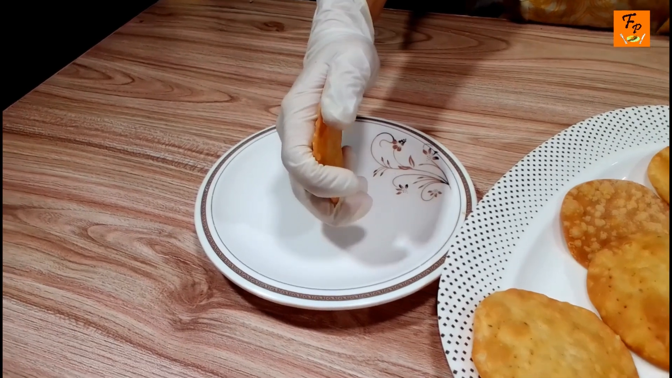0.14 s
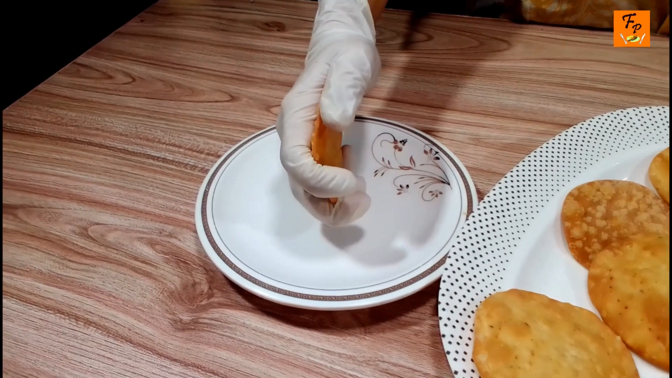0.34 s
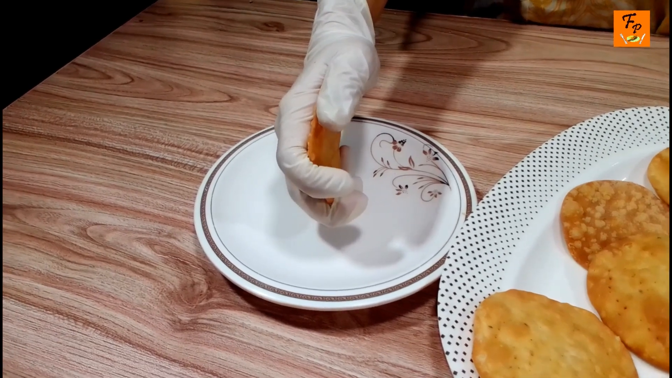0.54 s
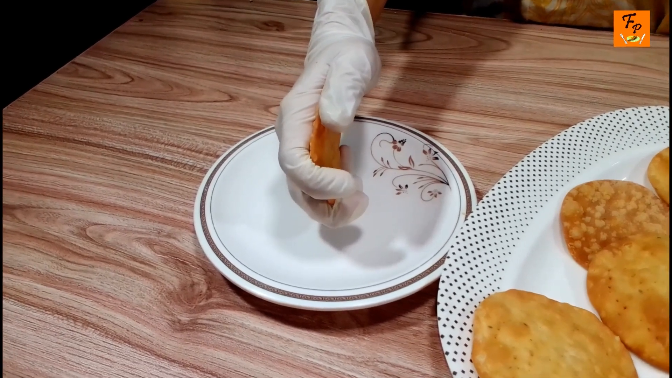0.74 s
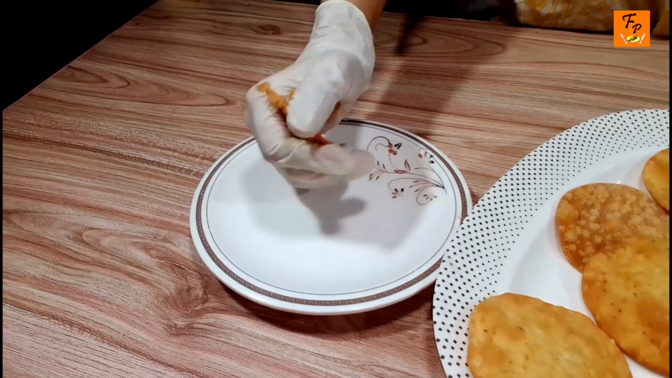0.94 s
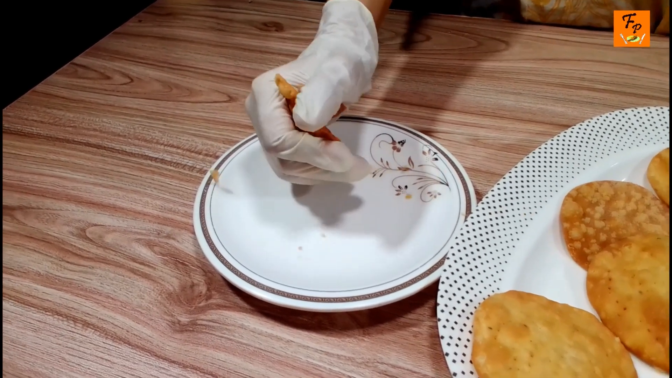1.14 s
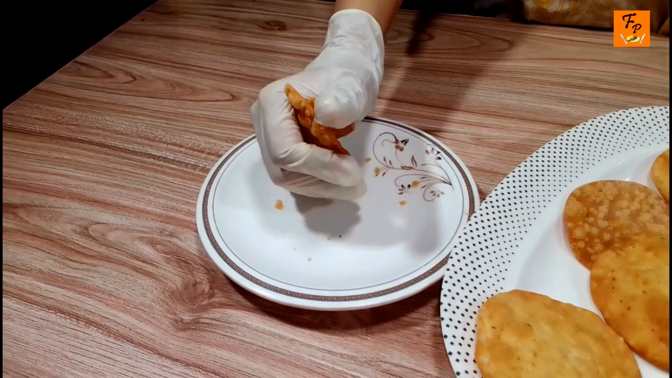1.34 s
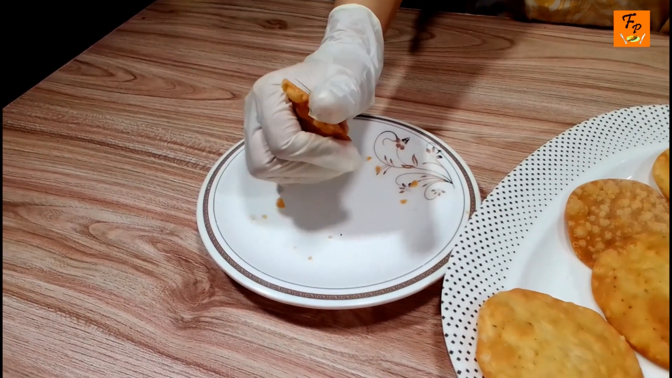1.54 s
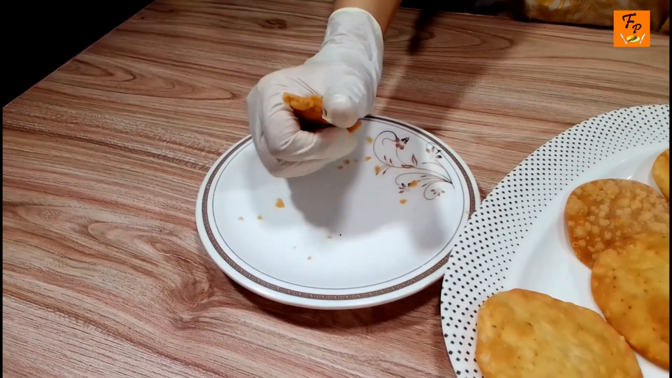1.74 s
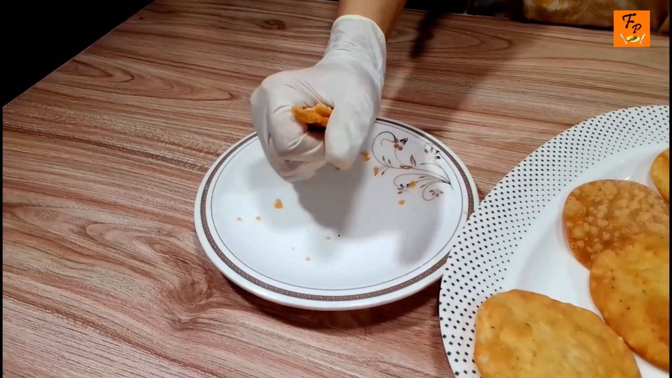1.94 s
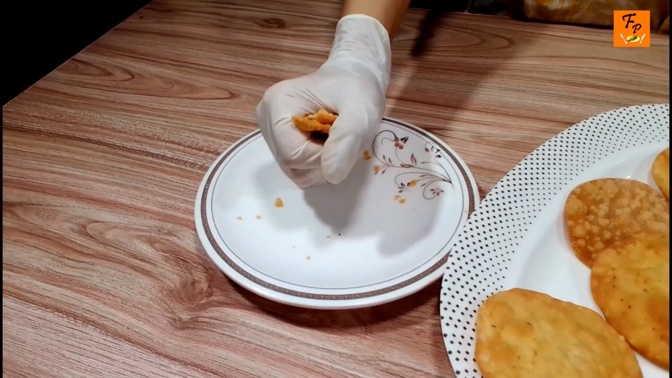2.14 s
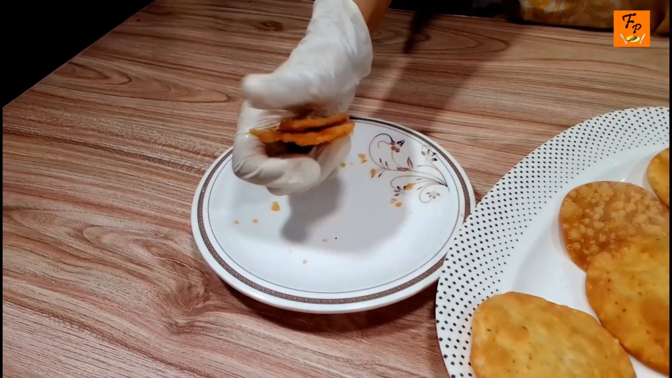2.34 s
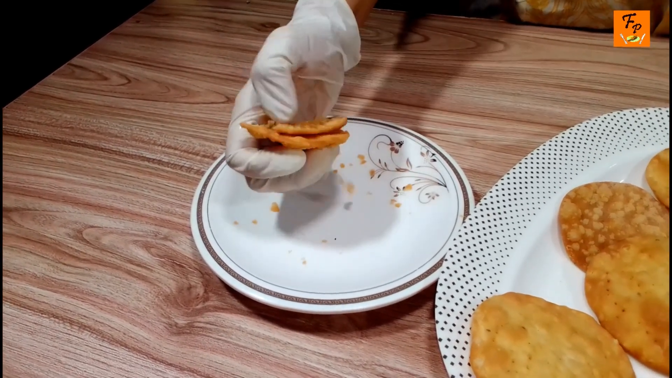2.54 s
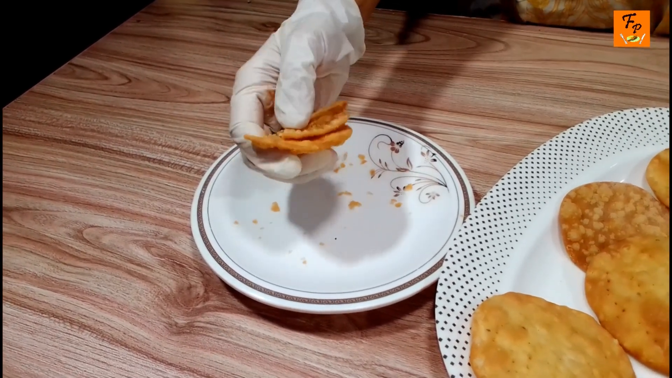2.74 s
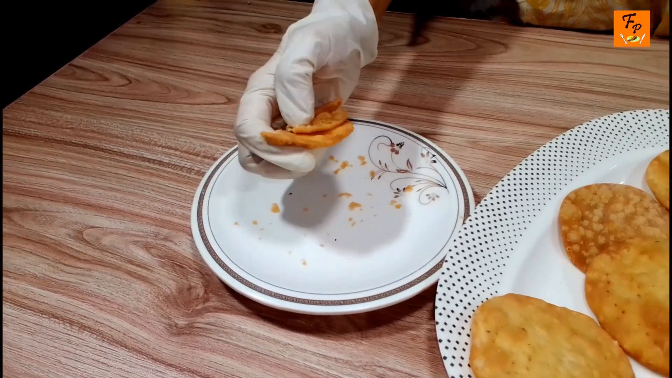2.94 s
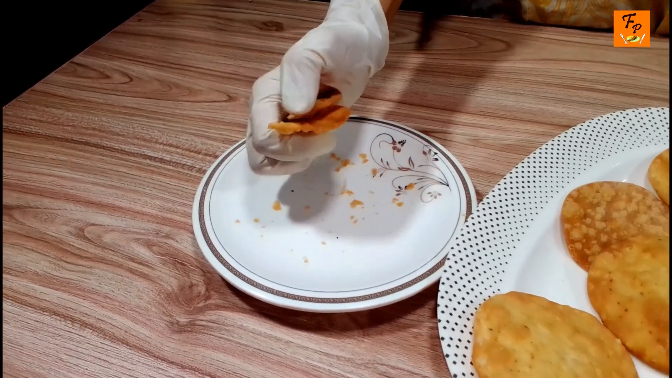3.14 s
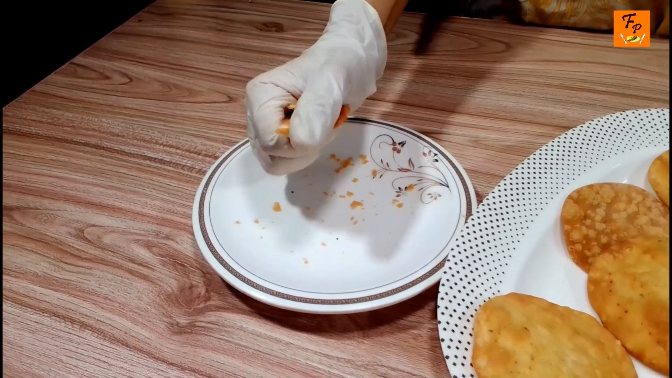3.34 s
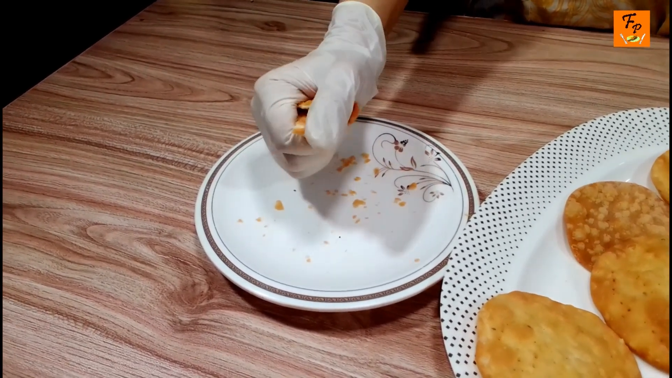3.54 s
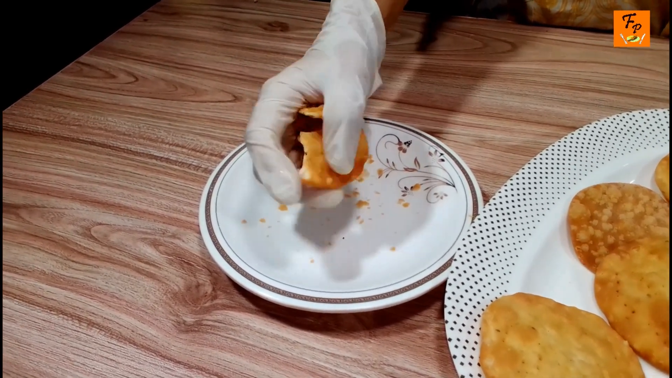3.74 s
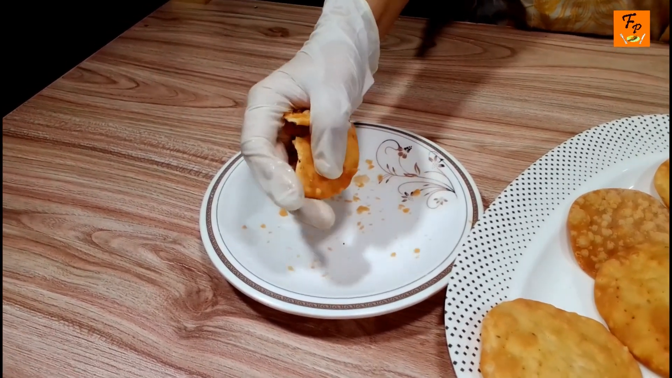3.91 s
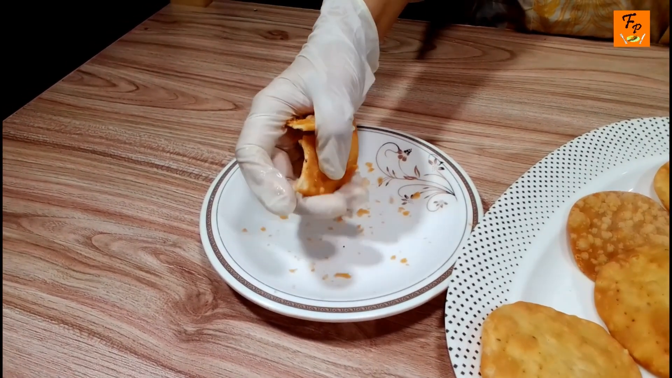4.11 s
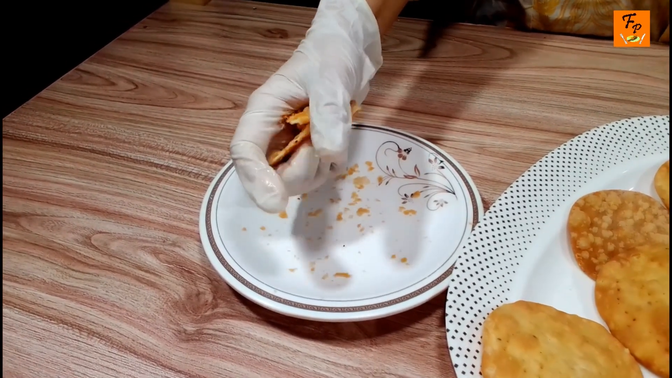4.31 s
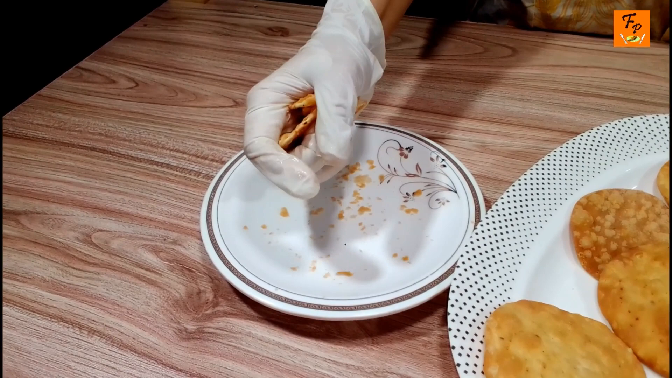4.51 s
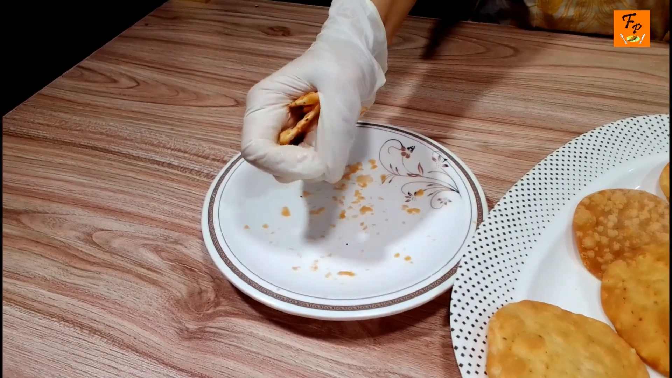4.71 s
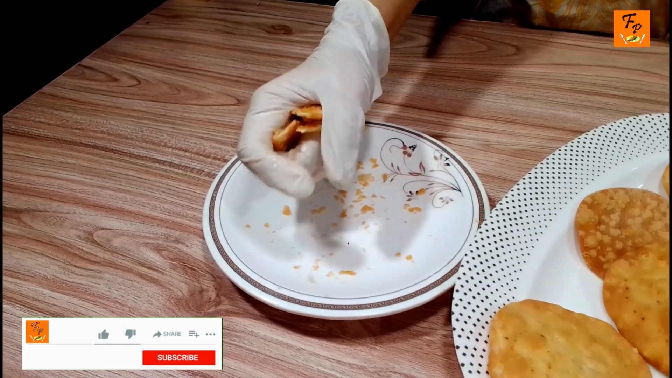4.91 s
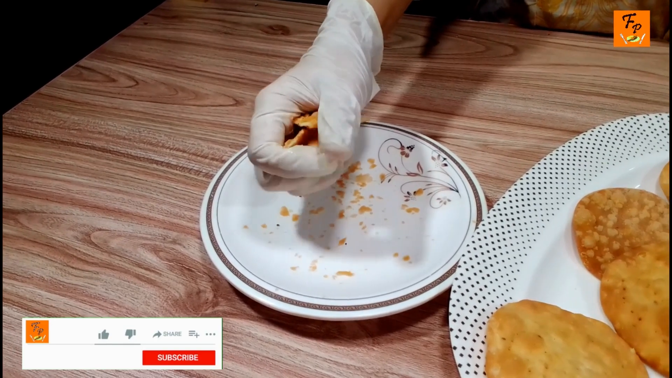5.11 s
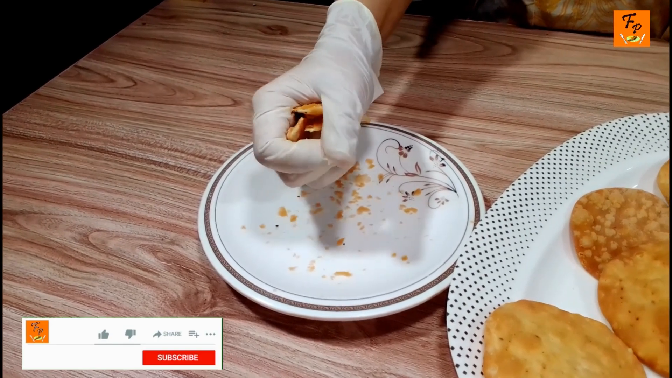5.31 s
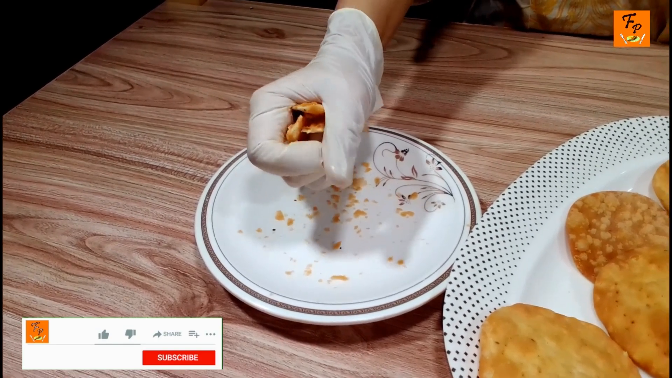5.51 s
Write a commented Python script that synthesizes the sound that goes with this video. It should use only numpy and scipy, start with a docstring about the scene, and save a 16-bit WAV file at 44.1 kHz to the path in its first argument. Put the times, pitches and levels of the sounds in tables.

```python
"""Crisp fried wafers crushed in a gloved hand over a plate, in four squeezes, heard close up in a quiet, live kitchen.
Each fracture is a burst of tiny breaks that rings the broken piece; flakes tick and crumble in between.
The glove hisses, pieces squeak in the grip and the plate rings faintly, over a steady room noise.
The close microphone has a strong peak near 4 kHz and its input clips on the biggest snaps."""
import sys
import numpy as np
from scipy import signal
from scipy.fft import rfft, irfft, next_fast_len
from scipy.io import wavfile

SR = 44100
rng = np.random.default_rng(int(sys.argv[2]) if len(sys.argv) > 2 else 0)


def digitize_waveform(pressure):
    """Quantize a signal to 16-bit integers and store it at the path in sys.argv[1].

    Rows of a 2-D input are taken as channels; values are limited to [-1, 1].
    """
    field = np.atleast_2d(pressure).T
    bounded = np.clip(field, -1, 1)
    quanta = np.round(bounded * 32767).astype(np.int16)
    wavfile.write(sys.argv[1], SR, quanta)


N = 245322   # samples in the scene
CRACK_SIZE = 2048   # samples in one fracture
LEVEL_WINDOW_S = .003   # the level of a snap or flake is its rms as if spread over this time


def from_db(db):
    """Decibels to gain."""
    return 10 ** (np.asarray(db) / 20)


def unit_energy(x):
    """Scale to a sum of squares of one."""
    return x / np.sqrt(np.sum(x ** 2) + 1e-20)


def at_hz(points, hz):
    """Read a two-column table on a log-frequency axis."""
    knots, values = np.transpose(points)
    return np.interp(np.log(np.maximum(hz, 1)), np.log(knots), values)


def bands_of(rows, hz):
    """Read every column of a table at one frequency."""
    table = np.array(rows)
    return [np.interp(np.log(hz), np.log(table[:, 0]), column) for column in table[:, 1:].T]


def at_time(rows, s):
    """Read every column of a curve at one moment."""
    times, *columns = np.transpose(rows)
    return [np.interp(s, times, column) for column in columns]


def bins(size):
    """Frequencies of a real transform, in Hz."""
    return np.arange(size // 2 + 1) * SR / size


def resonance(ratio, q):
    """Gain of one mode, 1 on top, against frequency over its own."""
    return ratio / q / np.hypot(1 - ratio ** 2, ratio / q)


def above(ratio, order):
    """A smooth step from 0 to 1 as the ratio passes one."""
    return 1 - 1 / (1 + ratio ** order)


def causal(gain):
    """Minimum-phase response with these gains: it rings only after the blow."""
    cepstrum = irfft(np.log(gain + 1e-9))
    half = len(cepstrum) // 2
    cepstrum[1:half] *= 2
    cepstrum[half + 1:] = 0
    return np.exp(rfft(cepstrum))


def noise(spectrum):
    """Steady coloured noise, rms 1."""
    size = 2 * next_fast_len(N // 2 + 1)
    white = rfft(rng.standard_normal(size))
    coloured = irfft(white * from_db(at_hz(spectrum, bins(size))))
    return unit_energy(coloured[:N]) * np.sqrt(N)


def add(track, s, sound):
    """Mix a sound in at a time in seconds."""
    start = max(round(s * SR), 0)
    track[start:start + len(sound)] += sound[:max(N - start, 0)]


def swells(rows, rest_db):
    """Level in dB at every sample: each movement sets in, builds up and lets go, over a resting level."""
    t, db = np.arange(N) / SR, rest_db
    for s, peak_db, build_s, release_s, *_ in rows:
        swell_db = peak_db - 20 * np.maximum((s - t) / build_s, (t - s) / release_s)
        db = np.where(t > s - build_s, np.maximum(db, swell_db), db)
    return db


# bending modes of a broken piece: multiple [of its lowest mode], level_db [dB]
PIECE_MODES = [(1, 5.5), (1.5, 1), (1.85, -1), (2.25, -6.5)]
# the grip and what it holds: time_s [s], hollow_hz [Hz, air resonance of the cupped hand],
# hollow_db [dB, its strength], crisp_db [dB, on the upper modes]
GRIP = [(.66, 1670, -14.5, 4), (.78, 1668, 2, -0.5), (.86, 1592, 3, -5), (1.15, 1600, 5, -3),
        (1.8, 1377, -0.5, 1.5), (2.1, 1410, -1.5, 2), (3.25, 2090, 3, -0.5), (3.34, 2343, 1.5, 7),
        (3.6, 2307, 0.5, -5), (4.2, 2248, 1.5, -5), (4.42, 2216, -11, -1), (4.67, 2013, -4.5, 7)]
# colour of the close microphone: freq_hz [Hz], gain_db [dB]
MICROPHONE = [(30, -26), (165, -44), (215, -34), (1000, -21), (2500, -18.5), (3500, -11.5), (3900, -2.5),
              (4200, 3), (4700, -4.5), (5500, -13.5), (6800, -20), (8000, -27.5), (10800, -30),
              (14300, -21.5), (16000, -32.5)]


def crack(s, tear_ms, mode_hz, treble_db, bass_db, hollow_db, lead_db=0, rise_ms=0.15, mode_q=13, hollow_q=4,
          dense_db=-3, breaks_db=2, breaks_per_s=7000, treble_hz=7400, damping_hz=7200, far_overtones_db=-4,
          crisp_hz=5000):
    """One fracture as the close microphone picks it up, breaks ringing the piece, with unit energy."""
    ms, hz = np.arange(CRACK_SIZE) / SR * 1000, bins(CRACK_SIZE)
    # the first wall gives way, then a run of smaller cells swells and dies
    breaks = rng.standard_normal(CRACK_SIZE) * (rng.random(CRACK_SIZE) < breaks_per_s / SR)
    run = (1 - np.exp(-ms / rise_ms)) * np.exp(-ms / max(tear_ms, .1))
    force = from_db(breaks_db) * unit_energy(breaks * run)
    force[0] += from_db(lead_db)
    # a piece radiates from its lowest bending mode up; the oily crust damps the high modes
    ratio = hz / mode_hz
    modes = sum((from_db(db) * resonance(ratio / multiple, mode_q)) ** 2 for multiple, db in PIECE_MODES)
    ringing = modes * (1 - above(hz / damping_hz, order=12)) + from_db(dense_db) ** 2
    overtones = from_db(far_overtones_db * above(ratio / 3.15, order=10)) ** 2
    radiating = above(ratio / 0.9257, order=28) * overtones
    # the cupped hand adds its own resonance, and the bass is a level floor beneath
    hollow_hz, cupped_db, crisp_db = at_time(GRIP, s)
    hollow = from_db(hollow_db + cupped_db) * resonance(hz / hollow_hz, hollow_q) ** 2
    body = np.sqrt(radiating * ringing + hollow ** 2 + from_db(bass_db) ** 2)
    upper_modes = above(hz / crisp_hz, order=20) * (1 - above(hz / damping_hz, order=20))
    treble = treble_db * above(hz / treble_hz, order=8)
    colour_db = crisp_db * upper_modes + treble + at_hz(MICROPHONE, hz)
    return unit_energy(irfft(rfft(force) * causal(body * from_db(colour_db))))


# steady room noise, before its low cut: freq_hz [Hz], density_db [dB per Hz, relative]
AIR = [(120, -48.5), (200, -9), (278, -4.5), (516, -9.5), (619, -10), (890, -11), (958, -13.5),
       (1050, -11.5), (1460, -14), (2380, -18), (2610, -17.5), (3020, -17.5), (4190, -22), (6600, -46),
       (15500, -49.5)]
AIR_DB = -53


def room_air(low_cut_hz=205, rumble_db=-84):
    """Steady room noise as filtered random hush, with very little left in the bass."""
    low_cut = signal.butter(8, low_cut_hz, "high", fs=SR, output="sos")
    hush = signal.sosfilt(low_cut, noise(AIR))
    rumble = noise([(20, -1.0), (60, -7.0), (110, -3.0), (200, 0), (600, -57.5)])
    return from_db(AIR_DB) * hush + from_db(rumble_db) * rumble


# presses of the fingers, each a burst of crumbling: peak_s [s], level_db [dB, before the mix trim],
# build_s and release_s [s, each over 20 dB], mode_hz [Hz, lowest mode of the fragments before their size spread]
PRESSES = [(.44, -51, 0.029, 0.17, 3620), (.664, -32, 0.0075, 0.29, 4300),
           (.86, -20.5, 0.0236, 0.124, 3000), (1.08, -37.5, 0.32, 0.201, 3215),
           (1.43, -47.5, 0.187, 0.14, 4027), (1.66, -39.5, 0.118, .25, 3212), (1.8, -26, 0.084, .12, 2450),
           (1.97, -41.5, .3, 0.073, 2500), (2.24, -43.5, 0.115, 0.159, 4266),
           (2.52, -51.5, .08, 0.68, 3850), (2.82, -52.5, .5, 1, 3725), (3.21, -41.5, 0.097, 0.98, 3486),
           (3.34, -42, 0.37, 0.127, 3140), (3.65, -42, 0.376, .22, 3040),
           (3.87, -37.5, 0.0505, 0.063, 3486), (4.17, -30.5, 0.063, 0.096, 3109),
           (4.42, -29, 0.1165, .095, 3132), (4.7, -39, .1, 0.097, 2986), (5.1, -46.5, .2, 0.201, 3204),
           (5.33, -42, 0.116, 0.22, 3450)]
HOLD_DB = -64   # grinding while the pieces are only held, before the mix trim
# a light press only rubs off fine, bright dust; a harder one breaks duller fragments
MEDIUM_PRESS_DB = -41
DUST_TREBLE_DB, DUST_PER_DB = -2, -.55   # treble at a medium press, and its change per dB of press


def fragment_hz(s, size, highest_hz=3900):
    """Lowest mode of a fragment from the nearest press, kept no higher than a set pitch."""
    press = min(PRESSES, key=lambda row: abs(row[0] - s))
    return min(press[-1] * np.exp(size), highest_hz)


def crumbling(per_s=520, spread_db=4.8, size_spread=0.24, tear_ms=0.39, treble_spread_db=3, bass_db=-19,
              hollow_db=-5, count=200):
    """A stream of small random breaks; one fragment after another takes the load and rings."""
    press_db = swells(PRESSES, HOLD_DB)
    sizes = from_db(spread_db * np.minimum(rng.exponential(1, N), 3)) * rng.choice([-1, 1], N)
    breaks = unit_energy(sizes * (rng.random(N) < per_s / SR)) * np.sqrt(N) * from_db(press_db)
    out = np.zeros(N)
    turns = np.array_split(np.arange(N), count)
    for turn, (size, sharpness) in zip(turns, rng.standard_normal((count, 2))):
        s = turn[0] / SR
        harder_db = press_db[turn].max() - MEDIUM_PRESS_DB
        treble_db = DUST_TREBLE_DB + DUST_PER_DB * harder_db + treble_spread_db * sharpness
        fragment = crack(s, tear_ms, fragment_hz(s, size_spread * size), treble_db, bass_db, hollow_db)
        add(out, s, signal.fftconvolve(breaks[turn], fragment))
    return out


# the glove sliding over the wafer: peak_s [s], level_db [dB], build_s and release_s [s, each over 20 dB]
GLOVE_SLIDES = [(.27, -54.5, 0.09, 0.05), (.36, -53, 0.12, 0.04), (2.56, -68, .1, 0.03)]
# spectrum of the glove: freq_hz [Hz], density_db [dB per Hz, relative]
GLOVE_HISS = [(2500, -20), (4800, 0), (6200, -1), (7700, -2), (10000, -8), (15000, -16)]
GLOVE_REST_DB = -71.5


def glove_slides():
    """Friction of the glove on the wafer: coloured noise that swells with each slide."""
    return from_db(swells(GLOVE_SLIDES, GLOVE_REST_DB)) * noise(GLOVE_HISS)


# flakes chipping off and crumbs landing: start_s [s], level_db [dB], treble_db [dB]
TICKS = [(.345, -44, 7.5), (0.426, -29.5, -0.5), (0.4643, -42, 14), (.4957, -39.5, 7.5),
         (0.7619, -27.5, -15.5), (1.0891, -38.5, 3.5), (1.1246, -18, -45), (1.1464, -29.5, -20.5),
         (1.4369, -38, 10), (1.4598, -25.5, -2.5), (1.583, -37.5, 4), (1.6327, -22.5, -36.5),
         (1.663, -29, 15), (1.765, -29.5, 11.5), (1.7797, -27, 2), (1.9739, -32, -9), (2.0189, -31.5, -5),
         (2.0481, -35, 5), (2.777, -43, 23), (2.9235, -45, 7.5), (2.9988, -38.5, 7), (3.014, -38, 13.5),
         (3.1282, -40, 4.5), (3.1648, -38.5, 2), (3.1765, -31, -22.5), (3.208, -36.5, -4.5),
         (3.601, -35, 0), (3.6503, -30, -30), (3.7294, -32, -8), (3.8578, -32, -7), (4.1214, -30, 1),
         (4.1493, -21.5, -39.5), (4.155, -24.5, -17), (4.1731, -29, -15.5), (4.1868, -20, -38),
         (4.2152, -19.5, -37.5), (4.237, -30, 5), (4.334, -29.5, 1), (4.346, -29, 3), (4.38, -20.5, -6.5),
         (4.402, -27, -1), (4.484, -22, -19), (4.5257, -28, -3.5), (4.5416, -22.5, -13.5),
         (4.5572, -29.5, -18.5), (4.566, -27, -3.5), (4.603, -31.5, -18), (4.8755, -30, -.5),
         (5.086, -36, 8.5), (5.1486, -33, 12.5), (5.2782, -36.5, 4), (5.3118, -34, 5), (5.334, -31.5, 2),
         (5.3882, -33.5, -0.5)]


def ticks(size_spread=0.065, tear_ms=2.2, bass_db=-17, hollow_db=-7):
    """Single flakes, each a small fracture with a size of its own."""
    out = np.zeros(N)
    for s, level_db, treble_db in TICKS:
        mode_hz = fragment_hz(s, size_spread * rng.standard_normal())
        flake = crack(s, tear_ms, mode_hz, treble_db, bass_db, hollow_db, lead_db=-2.5, rise_ms=0.32)
        add(out, s, from_db(level_db) * np.sqrt(LEVEL_WINDOW_S * SR) * flake)
    return out


# big fractures: start_s [s], level_db [dB], tear_ms [ms], mode_hz [Hz, lowest mode of the piece],
# treble_db [dB], room_db [dB, send to the kitchen]
SNAPS = [(0.6584, -18, 0.16, 3317, 0, -10), (.773, -7, 3.5, 3030, -3, -10),
         (0.7778, -10, 0.58, 2540, -11, -5.5), (0.8317, -19, 3.1, 3420, -1, -21),
         (0.8352, 7, 3.08, 2184, -7.5, -15.5), (0.8413, 5.5, 3.12, 3140, -9.5, -7.5),
         (0.8645, -16, 1.6, 2980, -8, -10.5), (0.9013, -14.5, 3.6, 2990, -4.5, -23.5),
         (1.805, -11.5, 1.65, 3230, -1, -10.5), (1.808, -8, 1.42, 2165, -3.5, -4),
         (1.859, -19.5, 2.65, 2410, -15.5, -4.5), (1.8831, -8, 2, 2090, -14, -8),
         (1.905, -16, 1.86, 2350, -10, -11), (1.948, -19, 0.77, 2500, -16, -16),
         (1.9556, -21, 2.5, 2720, -8.5, -7), (3.247, -23.5, 4, 2970, 6.5, -12),
         (3.2527, -11.5, 4.8, 3912, -17.5, -7.5), (3.2842, -6.5, 0.394, 3400, -3.5, -7),
         (3.2883, -16, 1.54, 3420, -19.5, -21), (3.3307, -13.5, 0.57, 3020, -12, -5),
         (3.339, -12.5, 9.5, 3500, -3, -26), (4.4172, -16.5, 2.14, 3144, -24, -3.5),
         (4.431, -18.5, 1.9, 3150, -2.5, -21), (4.503, -21, 1.63, 3703, -7.5, -3),
         (4.636, -10, 2.03, 3197, -6, -8.5), (4.665, -7.5, 1.4, 3260, -3, -25),
         (4.6748, -4, 2.26, 3172, -4, -7)]
# a stronger fracture moves more of the wafer and of the air in the hand: dB at full scale, dB per dB of level
SNAP_BASS_DB, BASS_PER_DB = -8, 0.8725
SNAP_HOLLOW_DB, HOLLOW_PER_DB = 3, .15


def snaps():
    """The big fractures: what reaches the microphone directly, and what goes out into the room."""
    direct, sent = np.zeros((2, N))
    for s, level_db, tear_ms, mode_hz, treble_db, room_db in SNAPS:
        bass_db = SNAP_BASS_DB + BASS_PER_DB * level_db
        hollow_db = SNAP_HOLLOW_DB + HOLLOW_PER_DB * level_db
        fracture = crack(s, tear_ms, mode_hz, treble_db, bass_db, hollow_db)
        sound = from_db(level_db) * np.sqrt(LEVEL_WINDOW_S * SR) * fracture
        add(direct, s, sound)
        add(sent, s, sound * from_db(room_db))
    return direct, sent


# pieces dropping onto the plate: start_s [s], level_db [dB]
PLATE_HITS = [(1.765, -48.5), (1.81, -47.5), (1.889, -49.5)]
# modes of the plate: pitch_hz [Hz], level_db [dB], t60_s [s]
PLATE_MODES = [(1350, -3, 0.44), (1435, -1.5, 0.81)]


def plate():
    """The china plate rings faintly where a piece lands on it: decaying sines, one per mode."""
    out, t = np.zeros(N), np.arange(SR) / SR
    for s, level_db in PLATE_HITS:
        for hz, mode_db, t60 in PLATE_MODES:
            decay = np.exp(-np.log(1000) * t / t60)
            add(out, s, from_db(level_db + mode_db) * decay * np.sin(2 * np.pi * hz * t))
    return out


# pieces rubbing in the grip and squeaking: start_s [s], pitch_hz [Hz], length_s [s], level_db [dB, rms at the peak]
SQUEAKS = [(2.225, 4140, 0.033, -36), (2.256, 4198, 0.0417, -44), (3.635, 4880, 0.0294, -40),
           (3.722, 4140, 0.055, -43.5), (3.845, 4170, 0.028, -33.5), (3.958, 6330, 0.017, -49.5)]


def squeaks(waver_hz=45, count=8):
    """Short stick-slip tones of unsteady pitch."""
    out = np.zeros(N)
    for s, hz, length_s, level_db in SQUEAKS:
        along = np.linspace(0, 1, int(length_s * SR))
        waver = np.interp(along, np.linspace(0, 1, count), rng.standard_normal(count))
        tone = np.sin(2 * np.pi * np.cumsum(hz + waver_hz * waver) / SR)
        add(out, s, from_db(level_db) * np.sqrt(2) * np.sin(np.pi * along) ** 2 * tone)
    return out


def table_top(x, echo_db=-10, fade_s=0.012, first_s=.0012, echoes_per_s=1800):
    """Quick reflections from the hand, plate and table, as sparse fading echoes."""
    t = np.arange(CRACK_SIZE) / SR
    arrivals = (rng.random(CRACK_SIZE) < echoes_per_s / SR) * (t > first_s)
    echoes = rng.choice([-1, 1], CRACK_SIZE) * arrivals
    return x + from_db(echo_db) * signal.oaconvolve(x, unit_energy(echoes * np.exp(-t / fade_s)))[:N]


# kitchen tail: freq_hz [Hz], t60_s [s], level_db [dB, relative]
KITCHEN = [(300, 0.72, 6), (1490, 0.5745, 2), (4180, 0.493, -4), (7120, 0.42, -4.5), (14000, 0.33, -2.5)]


def kitchen(x, build_s=0.0069, count=9):
    """A diffuse tail of noise bands that builds up quickly and dies sooner in the treble."""
    t, tail = np.arange(SR) / SR, 0
    edges = np.geomspace(150, 18000, count + 1)
    for low, high in zip(edges, edges[1:]):
        band_pass = signal.butter(2, [low, high], "band", fs=SR, output="sos")
        band = signal.sosfilt(band_pass, rng.standard_normal(SR))
        t60, level_db = bands_of(KITCHEN, np.sqrt(low * high))
        tail = tail + band * from_db(level_db - 60 * t / t60)
    return signal.oaconvolve(x, unit_energy(tail * (1 - np.exp(-t / build_s))))[:N]


def scene(tick_room_db=-6, squeak_room_db=-11, crumble_room_db=-6.5, plate_room_db=-6, crumble_db=-1.0):
    """Fractures echo off the table top; they, the squeaks and the plate also excite the kitchen."""
    big, big_sent = snaps()
    flakes, rubs, china = ticks(), squeaks(), plate()
    grit = from_db(crumble_db) * crumbling()
    small_sent = from_db(tick_room_db) * flakes + from_db(crumble_room_db) * grit
    other_sent = from_db(squeak_room_db) * rubs + from_db(plate_room_db) * china
    room = kitchen(big_sent + small_sent + other_sent)
    close = table_top(big + flakes + grit) + rubs + china
    return (close + room + glove_slides() + room_air())[None]


def record(dry, offset=0.035, cutoff_hz=15800):
    """The input clips at full scale, slightly sooner on the negative side; the top is cut."""
    clipped = np.clip(dry, -1 + offset, 1)
    return signal.sosfilt(signal.ellip(10, .2, 80, cutoff_hz, fs=SR, output="sos"), clipped)


dry = scene()
out = record(dry)
digitize_waveform(out)
```